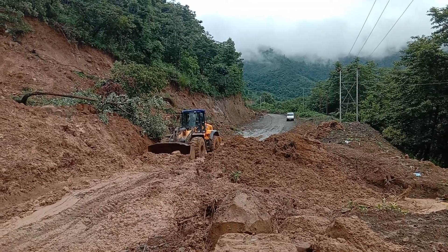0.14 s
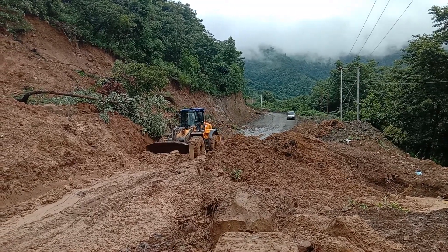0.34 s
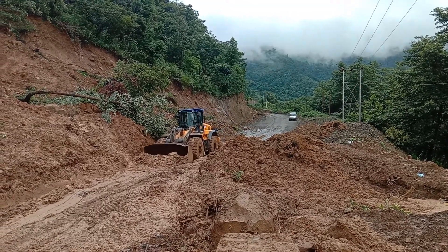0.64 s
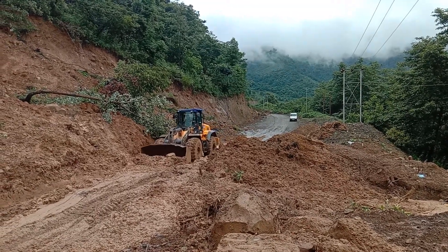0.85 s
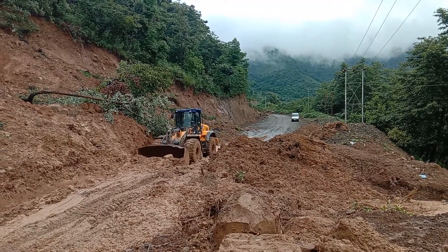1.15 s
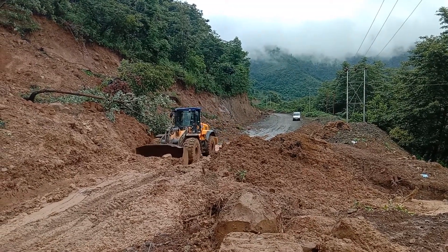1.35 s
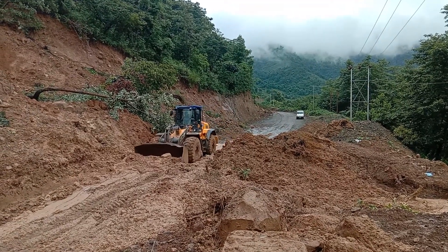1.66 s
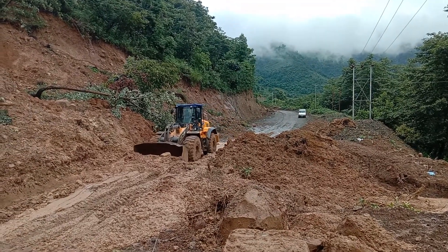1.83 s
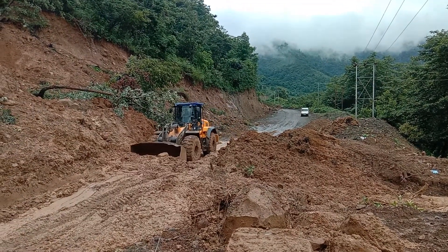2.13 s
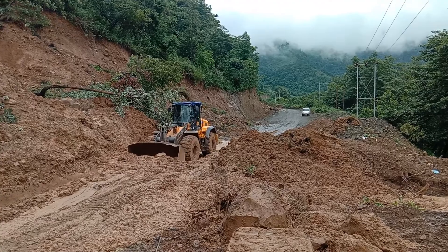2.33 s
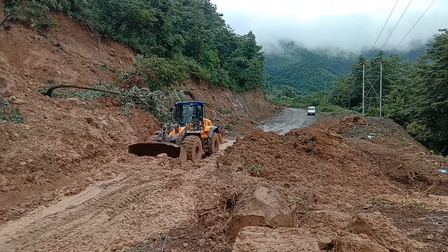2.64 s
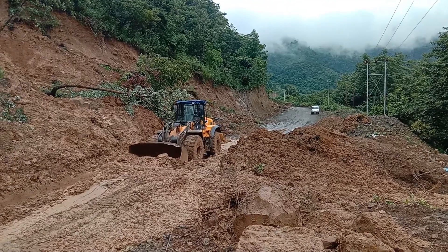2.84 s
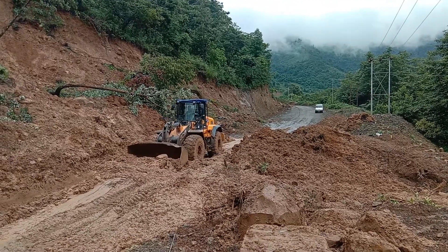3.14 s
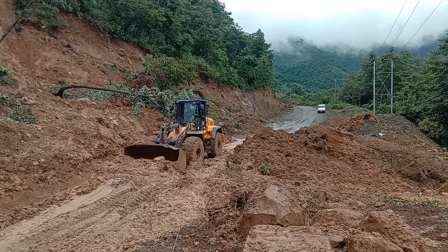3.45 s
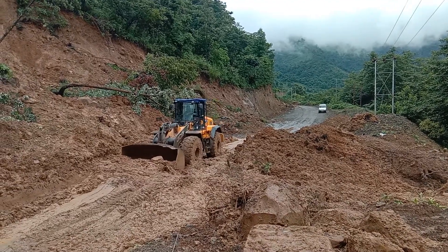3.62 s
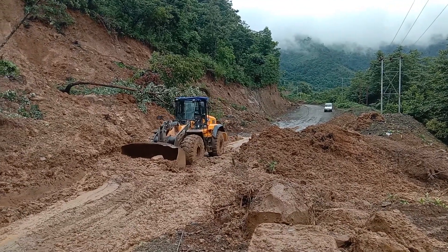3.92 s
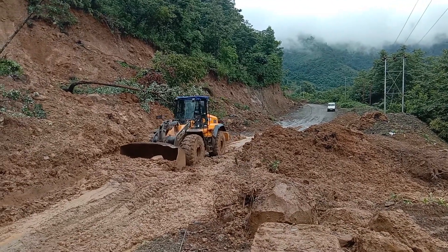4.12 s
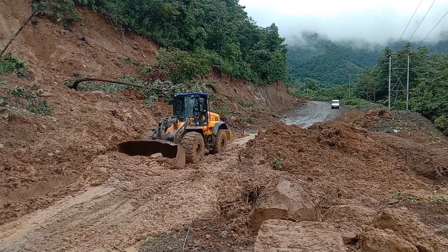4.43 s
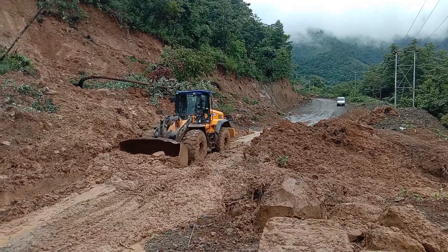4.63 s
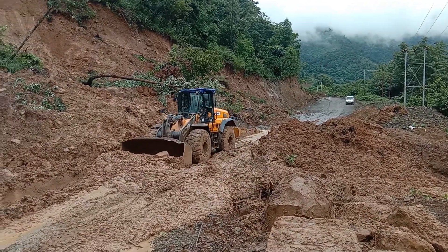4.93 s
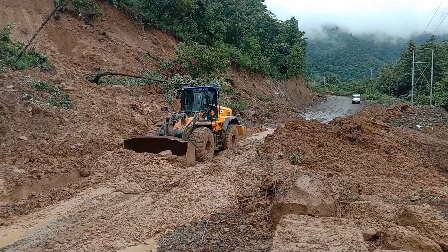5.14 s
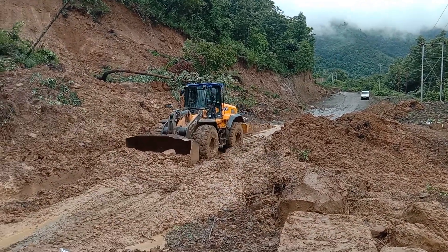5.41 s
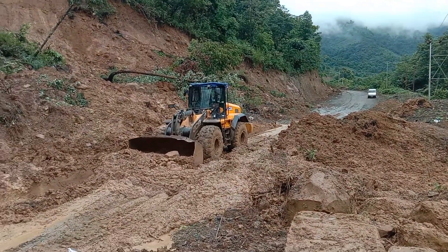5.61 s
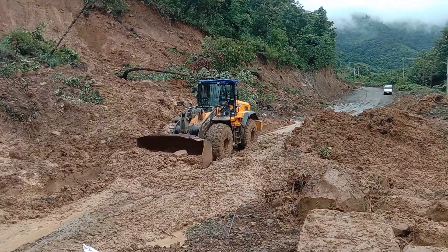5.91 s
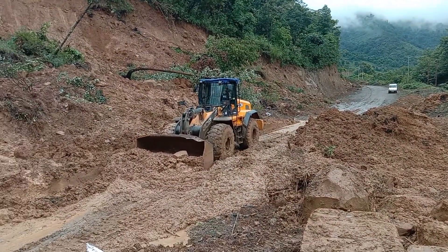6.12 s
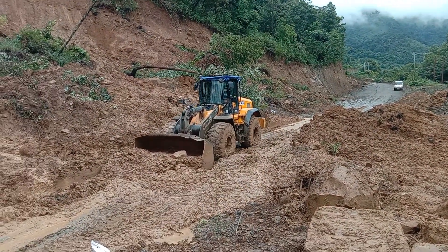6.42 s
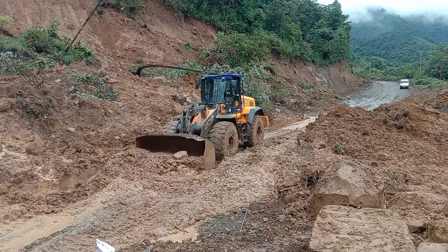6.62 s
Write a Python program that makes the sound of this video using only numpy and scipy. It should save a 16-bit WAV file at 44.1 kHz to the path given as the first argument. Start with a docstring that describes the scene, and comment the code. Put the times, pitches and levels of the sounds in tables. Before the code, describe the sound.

A large diesel engine drones at a nearly constant low pitch, uneven in level at first, then fuller and steadier as the loader crawls nearer. Tyres rumble through mud, and loose panels buzz in short fits. Small stones thud dully on the bucket, a pump whines near three seconds, and one heavy hollow metal knock with gravel patter stands out past five seconds. Open hillside, microphone some tens of metres away.

```python
"""Landslide: a six-cylinder diesel wheel loader crawls closer at steady high revs, pushing mud and stones.
Sines at the firing rate and shaft orders make the exhaust note; noisy puffs ring its pipe.
Shaped noise makes block clatter, tyres and fan; sines carry the pump whine, turbo whistle and panel buzz.
Stones ring the modes of the bucket, one rock hard, and drag or slide as filtered clicks.
The hillside returns a little of the metal sounds."""
import sys
import numpy as np
from scipy import signal
from scipy.fft import rfft, irfft
from scipy.io import wavfile
from scipy.ndimage import map_coordinates

SR = 44100
rng = np.random.default_rng(int(sys.argv[2]) if len(sys.argv) > 2 else 0)


def wav_record(signal):
    """Record a signal, one row per channel, as 16-bit PCM in the file named by sys.argv[1]."""
    frames = np.transpose(np.atleast_2d(signal))
    bounded = np.clip(frames, -1, 1)
    # unit amplitude maps onto the largest positive 16-bit level
    quanta = np.round(bounded * 32767).astype(np.int16)
    wavfile.write(sys.argv[1], SR, quanta)


N = 298336
TIME_S = np.arange(N) / SR

# exhaust note at the firing rate: (time [s], level [dB])
BOOM = [(0, -40), (.15, -35), (.42, -36), (.95, -39), (1.15, -32), (1.48, -29), (1.75, -32), (2.25, -33.5),
        (2.72, -28), (3.0, -35), (3.32, -45), (3.55, -36.5), (3.72, -27.5), (4.2, -26), (4.72, -27.5),
        (5.55, -26.5), (5.95, -24.3), (6.76, -25)]
# brief drops of that note: (time [s], half width to 1/e of the depth [s], depth [dB])
BOOM_DIPS = [(2.21, 0.057, -10.5), (2.45, 0.014, -9.5), (5.335, 0.013, -17), (6.511, 0.015, -14)]
# exhaust rumble, also followed by tyres and block growl: (time [s], base level [dB])
RUMBLE = [(0, -45), (.4, -49.5), (.9, -47), (1.2, -43.5), (1.78, -46.5), (2.3, -42), (2.8, -39.5),
          (3.1, -44), (4.1, -40.5), (4.8, -41), (5.8, -39.5), (6.25, -36.5), (6.76, -37)]
# crankshaft and driven parts: (multiple of shaft rate [1], relative level [dB])
SHAFT_ORDERS = [(2, -19), (4, -8), (4.5, -14.5), (5, -18), (6, -9), (6.7, -6.5), (7, -9.5), (8, -15.5),
                (9, -18.5), (13.5, -20), (15, -28.5)]
# exhaust pipe resonances: (centre [Hz], width of one pass [Hz], relative level [dB])
PIPE_MODES = [(145, 82, -5), (232.5, 41.6, 3.5), (307, 108, -2.5)]
# engine block spectrum: (frequency [Hz], relative level [dB])
BLOCK_SPECTRUM = [(300, -14), (400, -7), (470, -3), (560, -1), (740, 1), (880, -5.5), (1030, -11),
                  (1400, -13.5), (1680, -11), (1900, -15), (2400, -18), (3100, -28.5), (4200, -31.5),
                  (7500, -50)]
# cooling fan hiss spectrum: (frequency [Hz], relative level [dB])
FAN_SPECTRUM = [(5000, -6), (8000, -10.5), (9500, 2), (13000, 1), (15000, -5)]
# tyre and bucket edge spectrum: (frequency [Hz], relative level [dB])
TYRE_SPECTRUM = [(20, -14.5), (35, -10.5), (52, -0.5), (80, -3.5), (115, 0), (170, -2), (260, -10),
                 (500, -27.5)]
# turbocharger effort: (time [s], base level [dB])
TURBO_EFFORT = [(0.05, -80), (1.57, -80), (3.11, -75), (3.18, -71), (3.59, -67.5), (3.64, -75),
                (4.29, -77.5), (4.31, -74.5), (5.14, -73), (5.53, -75.5), (5.61, -69.5), (5.7, -77.5),
                (6.7, -74)]
# turbo intake hiss spectrum: (frequency [Hz], relative level [dB])
TURBO_SPECTRUM = [(12800, -34), (13400, -20.5), (13850, -13.5), (14080, 1.5), (14400, 2), (14650, 2),
                  (15500, -11)]
# bucket strokes loading the pump:
# (time [s], build-up [s], release [s], whine at the peak [dB], sag of firing rate [Hz])
STROKES = [(1.74, .09, .16, -48, .1), (2.63, .78, .15, -34.5, 1.8), (4.041, 0.17, .16, -47.5, .6),
           (4.42, 0.35, .24, -47.5, .7), (5.26, .17, .34, -40, 2.9), (5.96, 0.18, .24, -45.5, 1.1),
           (6.45, 0.17, .3, -43.5, .8)]
# fits of panel buzz: (time [s], length [s], level before fit_db [dB])
PANEL_FITS = [(0.854, 0.042, -49), (0.92, 0.054, -47.5), (1.578, 0.061, -49.5), (1.855, 0.1, -47.5),
              (2.11, 0.071, -48.5), (2.413, 0.08, -49), (2.562, 0.075, -48), (2.788, 0.15, -47),
              (2.997, 0.041, -47.5), (3.097, 0.069, -49), (3.416, 0.076, -49), (3.604, 0.046, -51.5),
              (3.867, 0.03, -48), (3.925, 0.062, -49), (4.035, 0.05, -49), (4.338, 0.21, -47.5),
              (4.774, 0.024, -43), (5.168, 0.032, -46), (5.236, 0.17, -48.5), (5.488, 0.13, -46),
              (6.013, 0.039, -49), (6.19, 0.029, -48), (6.593, 0.033, -46.5)]
# lift arm groan: (time [s], pitch [Hz], level [dB])
GROAN = [(0, 423, -41.5), (.06, 447, -59.5), (.12, 410, -47.5), (.17, 458, -52.5), (.28, 442, -73),
         (.4, 430, -110)]
# rocks dragging over the bucket floor: (time [s], length [s], level [dB])
DRAGS = [(1.452, 0.057, -49), (1.882, 0.068, -46.5), (3.198, 0.19, -47.5), (5.233, .085, -37),
         (6.08, 0.12, -46)]
# stones on the bucket:
# (time [s], strength [dB], frequency favoured by the struck spot [Hz], clank before halving [dB])
BLOWS = [(1.485, -26, 311, -17), (1.928, -21.5, 307, -13), (2.348, -31.5, 255, -7),
         (2.750, -31, 239.6, -17.5), (3.61, -32.5, 256, -4.5), (4.941, -35.5, 227.5, -9.5),
         (5.049, -27, 230, -21.5), (5.236, -11, 171, -27.5), (5.256, -18, 260, -28.5),
         (5.270, -13, 243, -28.5), (5.286, -13.5, 129.6, -19.5), (5.305, -14.5, 333, -20.5),
         (5.784, -36, 353, -0.5), (6.19, -29, 254, -7), (6.42, -30.5, 200, -13), (6.495, -26, 400, -21)]
# bucket modes: (frequency [Hz], level before the spot's weighting [dB], t60 [s])
BUCKET_MODES = [(80, -7, 0.064), (118.2, -1.5, 0.17), (170, -4.5, 0.046), (197, -1.5, 0.09),
                (233.7, 2, 0.12), (294, 3.5, 0.13), (347, -9, 0.11), (415, -14.5, 0.071), (560, -7, 0.18),
                (720, 1.5, 0.15)]
# gravel sliding along the bucket: (time [s], length [s], level [dB])
SLIDES = [(2.31, 0.055, -62.5), (3.57, 0.05, -61), (4.262, .12, -62), (4.65, 0.092, -62),
          (4.886, 0.061, -64), (5.271, .38, -59.5), (6.17, 0.087, -70)]
# faint high ticks: (time [s], level [dB])
FAINT_TICKS = [(5.405, -73), (5.459, -76), (5.493, -73.5), (5.628, -79)]

START_M, SPEED_M_S = 41.3, 2.47  # first distance, and crawl towards the microphone
FIRING_HZ = 104.8  # governed, no hydraulic load
PUMP_ORDER = 6  # multiple of the firing rate
STROKE_ONSET_S, PRESSURE_DB_PER_S, PRESSURE_HOLD_S, SAG_LAG_S = .04, 26.5, .047, .05
TOP_HZ = 15500


def undb(db):
    """Decibels to gain."""
    return 10 ** (np.asarray(db) / 20)


def unit(x):
    """Scale to rms 1."""
    return x / np.sqrt(np.mean(x ** 2))


def curves(table):
    """Table columns joined by straight lines in time."""
    s, *columns = np.transpose(table)
    return [np.interp(TIME_S, s, column) for column in columns]


def burst(s, length_s, edge_s):
    """Envelope that rises, holds for its length and falls."""
    return np.interp(TIME_S, [s - edge_s, s, s + length_s, s + length_s + edge_s], [0, 1, 1, 0])


def bump(s, half_width_s):
    """Gaussian envelope, 1/e at the half width."""
    return np.exp(-((TIME_S - s) / half_width_s) ** 2)


def noise():
    """White noise."""
    return rng.standard_normal(N)


def walk(rate_hz):
    """Smooth random curve of rms 1 that changes about rate_hz times a second."""
    hz = np.arange(N // 2 + 1) * SR / N
    return unit(irfft(rfft(noise()) / (1 + (2 * hz / rate_hz) ** 4), N))


def tone(hz):
    """Sine of rms 1 on a moving pitch."""
    turns = np.cumsum(hz) / SR + rng.random()
    return np.sqrt(2) * np.sin(2 * np.pi * turns)


def colour(x, points):
    """Shape a spectrum by (Hz, dB) points; it falls 20 dB per octave beyond the ends."""
    hz, db = np.transpose(sorted(points))
    point_octave = np.log2(hz)
    octave = np.log2(np.arange(N // 2 + 1) * SR / N + 1)
    outside = np.abs(octave - np.clip(octave, point_octave[0], point_octave[-1]))
    gain_db = np.interp(octave, point_octave, db) - 20 * outside
    return unit(irfft(rfft(x) * undb(gain_db), N))


def resonate(x, hz, width_hz):
    """One resonance, gain 1 at its centre."""
    return signal.lfilter(*signal.iirpeak(hz, hz / width_hz, fs=SR), x)


def resonate_twice(x, hz, width_hz):
    """Two passes of one resonance, for steeper skirts."""
    return resonate(resonate(x, hz, width_hz), hz, width_hz)


def dull(x, hz):
    """Steep low-pass."""
    return signal.sosfilt(signal.butter(4, hz, fs=SR, output="sos"), x)


def shimmer(x, depth_db, patch_s=.08, patch_hz=110, fade_hz=2900):
    """Moving air and ground reflections lift and drop spectral patches, less so in the treble."""
    hz, s, z = signal.stft(x, SR, nperseg=1024, noverlap=768)
    field = rng.standard_normal((400, 800))
    grid = np.meshgrid(hz / patch_hz, s / patch_s, indexing="ij")
    patches = map_coordinates(field, grid, order=3, mode="wrap")
    gain_db = depth_db * patches / (1 + (hz[:, None] / fade_hz) ** 4)
    return unit(signal.istft(z * undb(gain_db), SR, nperseg=1024, noverlap=768)[1][:N])


def hydraulics():
    """Strokes build pressure (as whine gain), hold it and let go; the firing rate sags (Hz) a little later."""
    pressure, sag_hz = 0, 0
    for s, build_s, release_s, db, drop_hz in STROKES:
        peak_s = s + build_s
        valve = np.interp(TIME_S, [s, s + STROKE_ONSET_S, peak_s, peak_s + release_s], [0, 1, 1, 0])
        build_db = -PRESSURE_DB_PER_S * np.maximum(peak_s - PRESSURE_HOLD_S - TIME_S, 0)
        pressure = pressure + valve * undb(db + build_db)
        sag_times_s = [s, peak_s, peak_s + .7 * release_s]
        sag_hz = sag_hz + np.interp(TIME_S - SAG_LAG_S, sag_times_s, [0, drop_hz, 0])
    return pressure, sag_hz


def boom(firing_hz, flutter_db=2.5, steady_flutter_db=1.03, steady_above_db=-26,
         unsteady_below_db=-35, waver_hz=.74):
    """Clean exhaust note at the firing rate; flutters when weak, steadies when strong."""
    db, = curves(BOOM)
    dips_db = sum(depth_db * bump(s, half_width_s) for s, half_width_s, depth_db in BOOM_DIPS)
    depth_db = np.interp(db, [unsteady_below_db, steady_above_db], [flutter_db, steady_flutter_db])
    flutter = depth_db * walk(46)
    return tone(firing_hz + waver_hz * walk(21)) * undb(db + flutter + dips_db)


def exhaust(firing_hz, rumble_db, surge_db=1.96, scatter=.98, gas_db=4, orders_db=-3, pipe_db=-2.0):
    """Shaft tones, and uneven puffs that ring the pipe; they surge together."""
    shaft_hz = firing_hz / 3  # three firings a turn
    orders = sum(tone(k * shaft_hz) * undb(db + 3 * walk(9)) for k, db in SHAFT_ORDERS)
    firings = np.cumsum(firing_hz) / SR
    puffs = np.diff(np.floor(firings), prepend=0) * (1 + scatter * noise())
    # turbulent gas follows each puff
    gas = unit(noise() * np.exp(-(firings % 1) / .4))
    drive = unit(puffs) + undb(gas_db) * gas
    pipe = 0
    for k, (hz, width_hz, db) in enumerate(PIPE_MODES):
        pipe = pipe + (-1) ** k * undb(db) * resonate_twice(drive, hz, width_hz)
    pipe = shimmer(pipe, depth_db=4.5, patch_s=.055, patch_hz=80)
    level = undb(rumble_db + surge_db * walk(46))
    return level * (undb(orders_db) * orders + undb(pipe_db) * pipe)


def clatter(firing_hz, scatter_db=3, decay_firings=.95, knock_db=-3):
    """Combustion knock: an uneven noise burst at each firing, over the steady rush of gears and fan."""
    firings = np.cumsum(firing_hz) / SR
    strength = undb(knock_db + scatter_db * noise()[firings.astype(int)])
    return unit(noise() * (1 + strength * np.exp(-(firings % 1) / decay_firings)))


def block(firing_hz, near_db, rumble_db, growl_db=-50.5, clatter_db=-59.0, growl_growth=.48,
          follow=.44, clatter_growth=.72, growl_surge_db=.75, clatter_surge_db=0.0):
    """Block radiates the knock: growl that partly follows the exhaust, clatter above 1100 Hz."""
    sound = shimmer(colour(clatter(firing_hz), BLOCK_SPECTRUM), depth_db=4.4, patch_s=.04, patch_hz=90)
    low, high = (signal.sosfilt(signal.butter(5, 1100, side, fs=SR, output="sos"), sound)
                 for side in ("low", "high"))
    follow_db = follow * (rumble_db - rumble_db.mean())
    low_db = growl_db + growl_growth * near_db + follow_db + growl_surge_db * walk(26)
    high_db = clatter_db + clatter_growth * near_db + clatter_surge_db * walk(42)
    return unit(low) * undb(low_db) + unit(high) * undb(high_db)


def fan(near_db, start_db=-90.5, growth=.7):
    """Faint fan hiss that grows as the loader nears."""
    return undb(start_db + growth * near_db) * colour(noise(), FAN_SPECTRUM)


def tyres(rumble_db, relative_db=-4, surge_db=.4):
    """Big tyres and the bucket edge rumble through mud: shaped noise at the rumble's level curve."""
    return colour(noise(), TYRE_SPECTRUM) * undb(rumble_db + relative_db + surge_db * walk(10))


def turbo(near_db, whistle_db=-6, hiss_db=.5, hz_per_db=17, waver_hz=9, idle_hz=14140, idle_db=-79):
    """Compressor whistle above intake hiss; more effort makes it louder and higher."""
    db, = curves(TURBO_EFFORT)
    effort_db = db - near_db / 2 - idle_db  # approach partly taken out of the pitch
    whistle = tone(idle_hz + hz_per_db * effort_db + waver_hz * walk(120))
    hiss = colour(noise(), TURBO_SPECTRUM)
    return undb(db) * (undb(whistle_db) * whistle + undb(hiss_db) * hiss)


def pump(firing_hz, pressure, near_db, idle_start_db=-60, waver_hz=1.2, flutter_db=2.36):
    """Hydraulic pump geared to the engine; whines louder with pressure."""
    gain = np.hypot(pressure, undb(idle_start_db + near_db))
    return tone(PUMP_ORDER * firing_hz + waver_hz * walk(21)) * gain * undb(flutter_db * walk(44))


def panel(firing_hz, near_db, hz=1260, wander_hz=30, width_hz=150, ring_db=-4, rasp_db=-4, fit_db=-1,
          edge_s=.015, idle_start_db=-56.0, idle_spread_db=3.5, growth=.24):
    """Steel panel buzzes in fits as the engine shakes it, stirs weakly between; its pitch wanders."""
    rasp = unit(resonate(resonate(clatter(firing_hz), hz, 2 * width_hz), hz, width_hz))
    ring = tone(hz + wander_hz * walk(36)) * undb(3.6 * walk(50))
    fits = sum(undb(db + fit_db) * burst(s, length_s, edge_s) for s, length_s, db in PANEL_FITS)
    stir = undb(idle_start_db + growth * near_db + idle_spread_db * np.tanh(2 * walk(6.5)))
    return np.maximum(fits, stir) * (undb(ring_db) * ring + undb(rasp_db) * rasp)


def groan(waver_hz=16):
    """Lift arm groans briefly on its pins: one wavering tone."""
    hz, db = curves(GROAN)
    return tone(hz + waver_hz * walk(88)) * undb(db + 2 * walk(50))


def hillside(x, t60_s=.82, delay_s=.025):
    """Scattered echoes from slope and trees: a decaying noise tail."""
    tail = noise() * np.exp(-np.log(1000) * TIME_S / t60_s) * (TIME_S > delay_s)
    return signal.fftconvolve(x, tail / np.linalg.norm(tail))[:N]


def grind(rise_s=.045, tail_s=.076, hz=370, width_hz=330, top_hz=850, slips_per_s=700):
    """Rocks drag over the bucket floor: random slips in a rough low scrape that dies away."""
    slips = (rng.random(N) < slips_per_s / SR) * noise()
    scrape = unit(dull(resonate(slips, hz, width_hz), top_hz))
    level = 0
    for s, length_s, db in DRAGS:
        rise = np.clip((TIME_S - s) / rise_s + 1, 0, 1)
        fall = np.exp(-np.maximum(TIME_S - s - length_s, 0) / tail_s)
        level = level + undb(db) * rise * fall
    return scrape * level


def bucket(contact_ms=1.7, spread_octaves=.67, slam=1.71, thud_top_hz=720,
           clank_hz=1350, clank_width_hz=600, clank_decay_s=.017):
    """Each stone pushes the bucket for a moment: low modes boom, and the steel edge clanks."""
    out = np.zeros(2 * N)
    t_s = TIME_S[:SR // 2]
    push = np.sin(np.pi * np.minimum(t_s * 1000 / contact_ms, 1)) ** 2
    hz, mode_db, t60_s = np.transpose(BUCKET_MODES)
    decay = np.exp(-np.log(1000) * t_s[:, None] / t60_s)
    modes = np.sin(2 * np.pi * hz * t_s[:, None]) * decay
    for s, db, spot_hz, clank_db in BLOWS:
        # each struck spot favours some modes
        distance = np.log2(hz / spot_hz) / spread_octaves
        share = undb(mode_db) / (1 + distance ** 2) ** 1.5
        swing = signal.fftconvolve(modes @ share, push)[:len(t_s)]
        # widest swings slam against the play in the pins and flatten
        thud = dull(np.tanh(slam * swing / np.abs(swing).max()), thud_top_hz)
        clank = unit(resonate(rng.standard_normal(len(t_s)), clank_hz, clank_width_hz))
        clank = clank * np.exp(-t_s / clank_decay_s)
        clank = dull(resonate_twice(clank, clank_hz, 2 * clank_width_hz), 2 * clank_hz)
        start = int(s * SR)
        out[start:start + len(t_s)] += undb(db) * (thud + .5 * undb(clank_db) * clank)
    # the blows carry little deep bass
    return signal.sosfilt(signal.butter(2, 70, "high", fs=SR, output="sos"), out[:N])


def gravel(hz=1750, width_hz=900, top_hz=2700, grains_per_s=2500, edge_s=.021):
    """Small stones slide over the steel in a dense patter of clicks."""
    clicks = (rng.random(N) < grains_per_s / SR) * noise()
    patter = dull(resonate(resonate(clicks, hz, width_hz), hz, 2 * width_hz), top_hz)
    level = sum(undb(db) * burst(s, length_s, edge_s) for s, length_s, db in SLIDES)
    return shimmer(patter, depth_db=5) * level


def squeak(s=2.774, half_width_s=.0084, hz=4180, level_db=-71):
    """Dry pivot squeaks once: a short wavering tone."""
    return undb(level_db) * bump(s, half_width_s) * tone(hz + 40 * walk(120))


def faint_ticks(hz=10800, width_hz=2000, half_width_s=.0013):
    """A few bright, very faint high ticks after the knock: short bumps of resonant noise."""
    snap = unit(resonate_twice(noise(), hz, width_hz))
    return snap * sum(undb(db) * bump(s, half_width_s) for s, db in FAINT_TICKS)


def scene():
    """Loader and echo; near_db is the gain of the approach, growth the share of it a source takes."""
    near_db = 20 * np.log10(START_M / (START_M - SPEED_M_S * TIME_S))
    pressure, sag_hz = hydraulics()
    firing_hz = FIRING_HZ - sag_hz
    rumble_db, = curves(RUMBLE)
    engine = boom(firing_hz) + exhaust(firing_hz, rumble_db)
    engine = engine + block(firing_hz, near_db, rumble_db) + fan(near_db)
    whines = turbo(near_db) + pump(firing_hz, pressure, near_db)
    metal = panel(firing_hz, near_db) + groan() + grind() + bucket() + gravel() + squeak()
    echo = undb(-11.0) * hillside(metal)
    return (engine + tyres(rumble_db) + whines + metal + echo + faint_ticks())[None]


def record(dry, low_cut_hz=40):
    """The microphone loses the deepest bass; the recorder cuts the top."""
    thin = signal.sosfilt(signal.butter(2, low_cut_hz, "high", fs=SR, output="sos"), dry)
    return signal.sosfilt(signal.ellip(10, .2, 70, TOP_HZ, fs=SR, output="sos"), thin)


dry = scene()
out = record(dry)
wav_record(out)
```